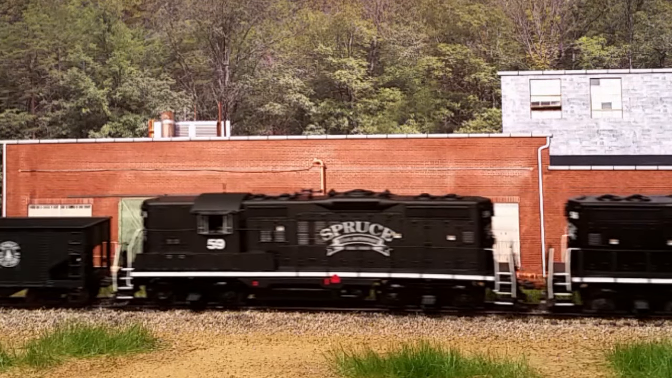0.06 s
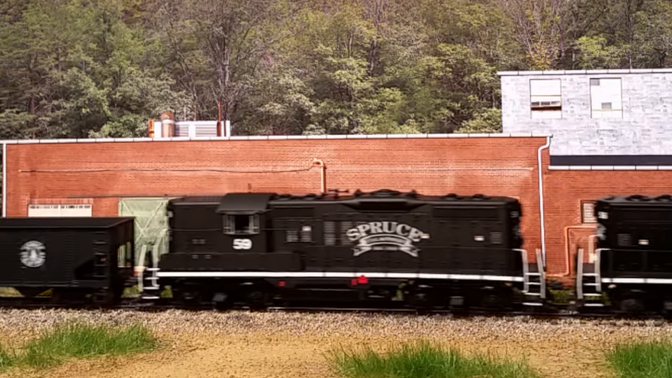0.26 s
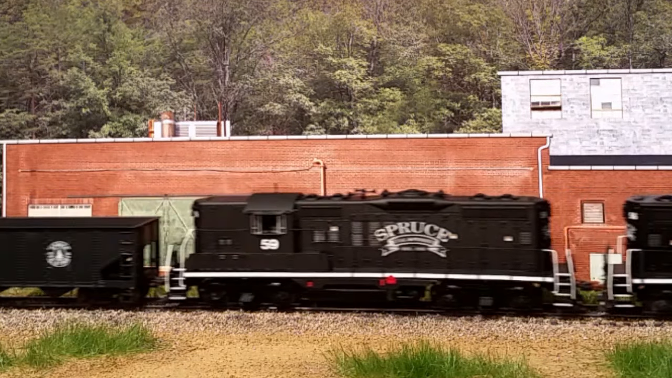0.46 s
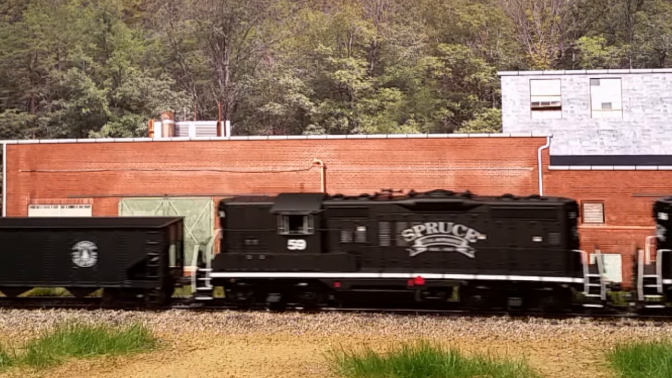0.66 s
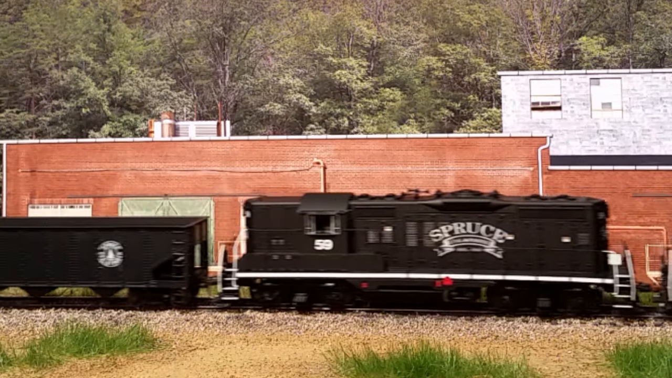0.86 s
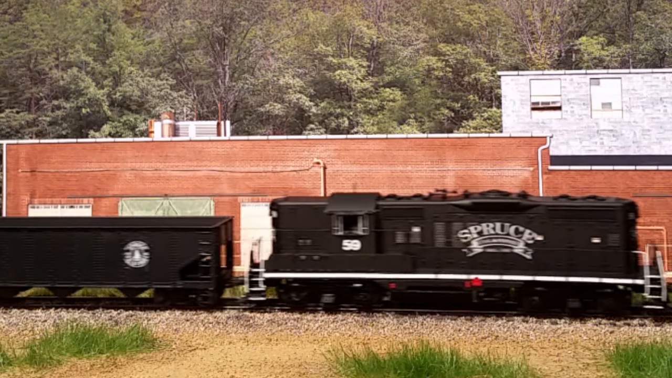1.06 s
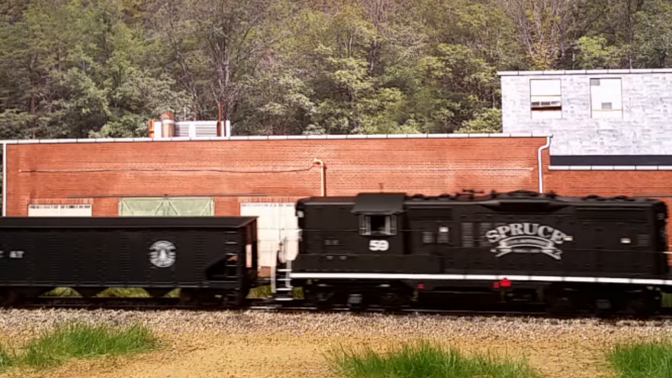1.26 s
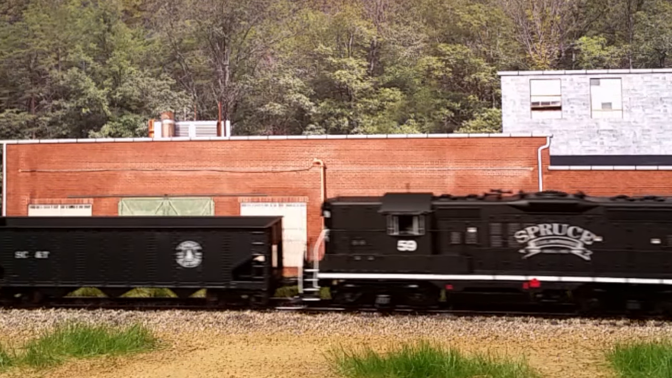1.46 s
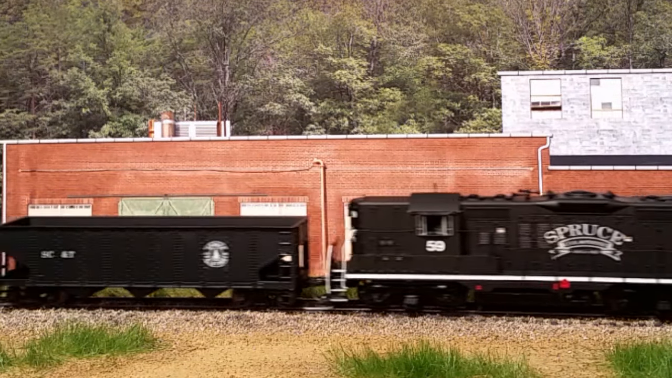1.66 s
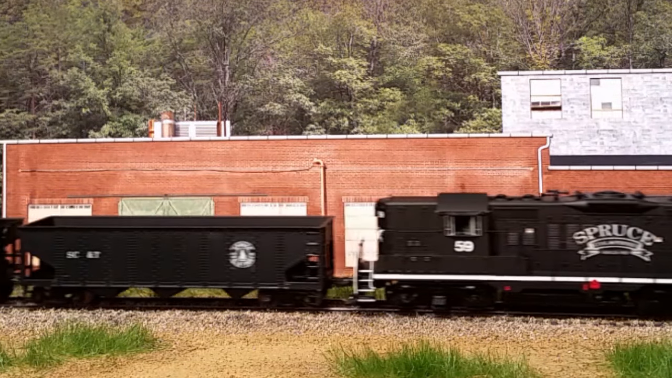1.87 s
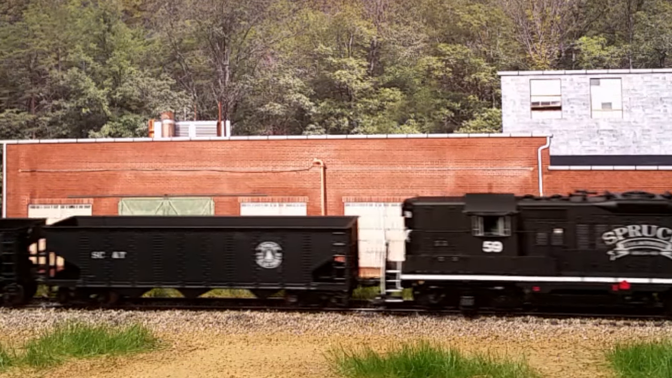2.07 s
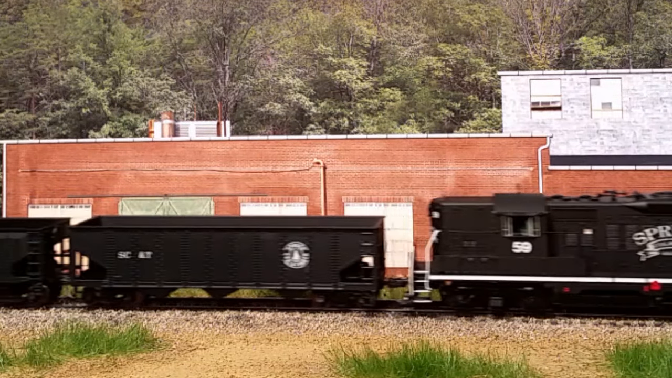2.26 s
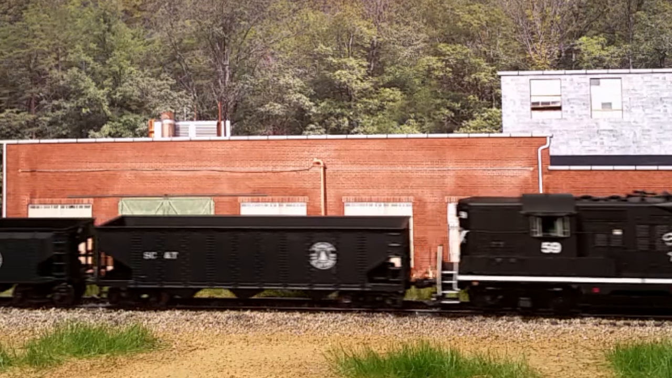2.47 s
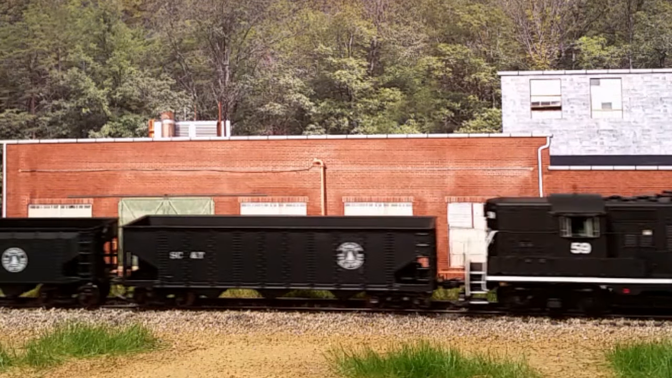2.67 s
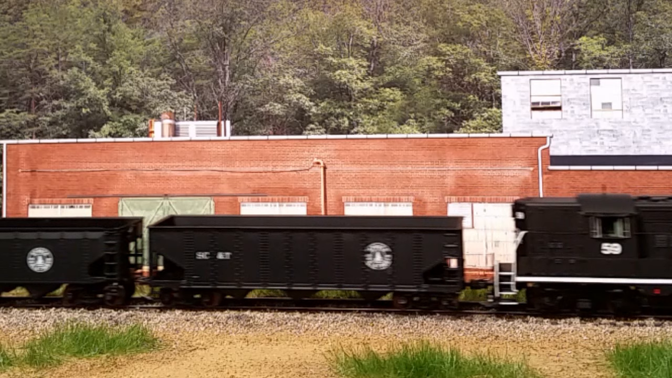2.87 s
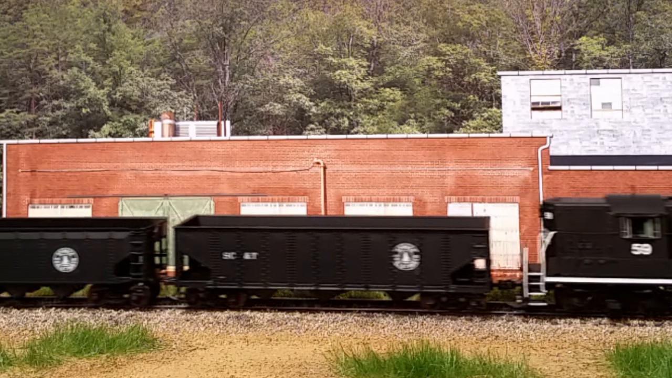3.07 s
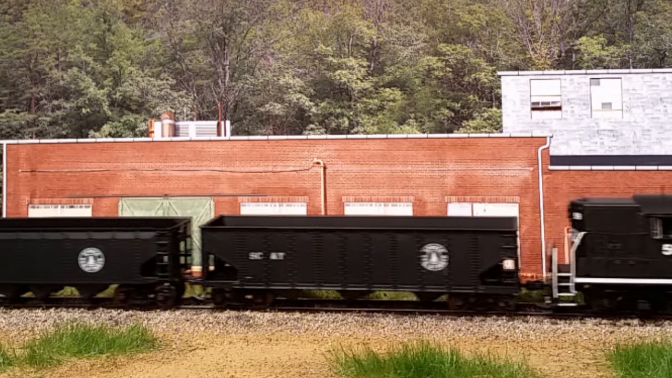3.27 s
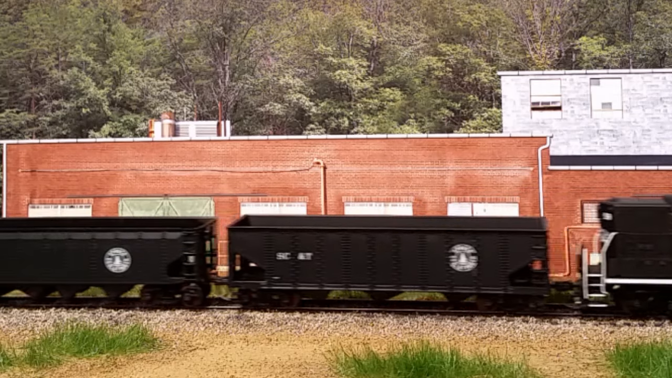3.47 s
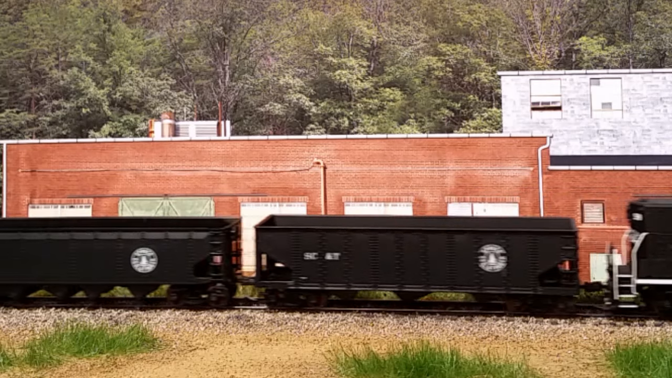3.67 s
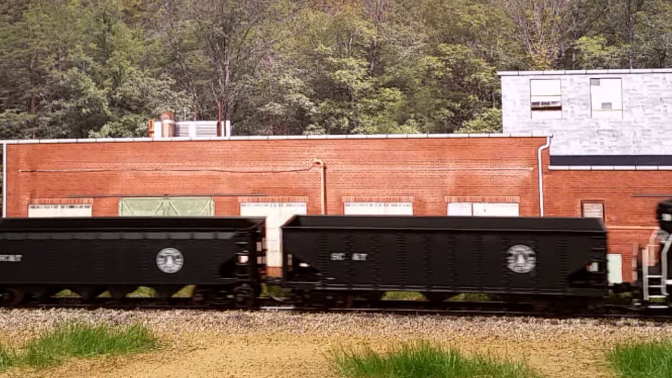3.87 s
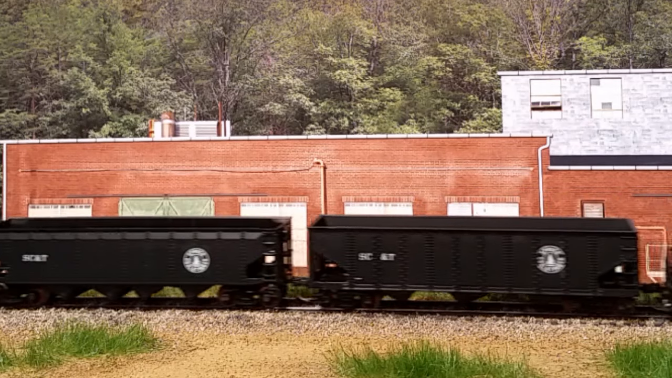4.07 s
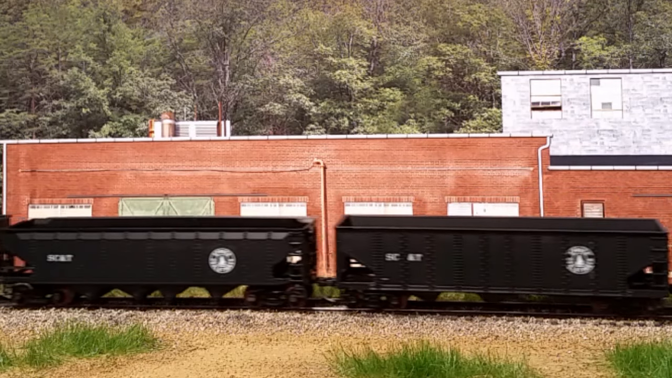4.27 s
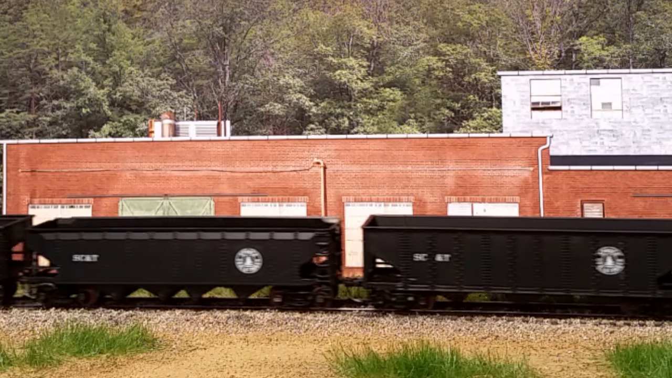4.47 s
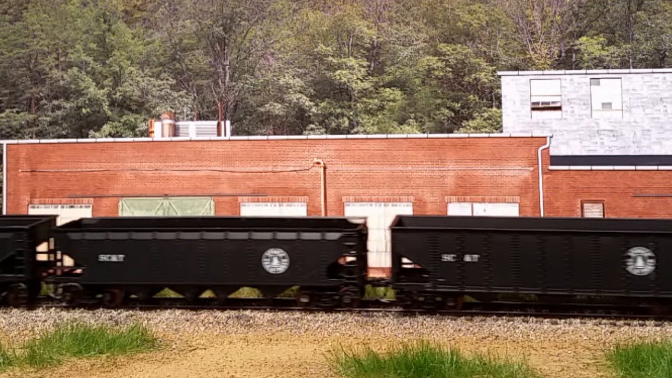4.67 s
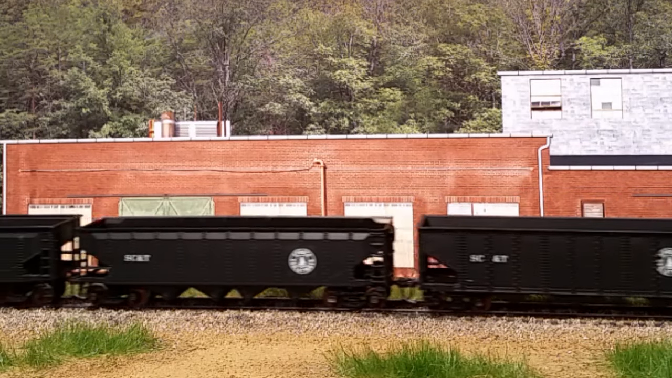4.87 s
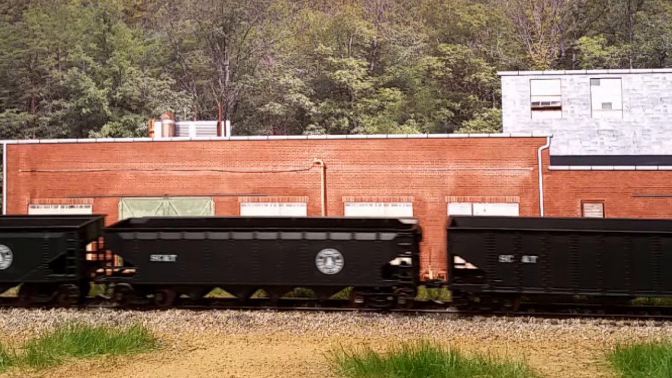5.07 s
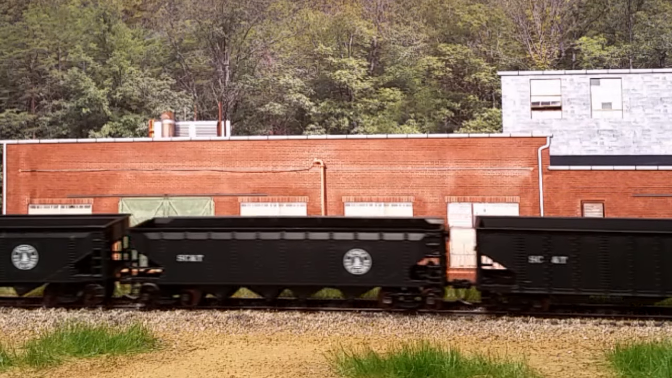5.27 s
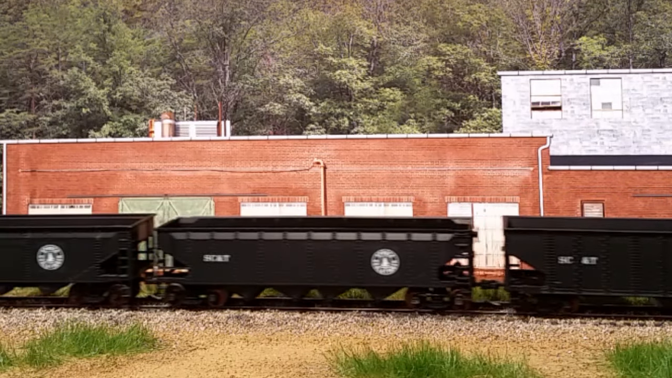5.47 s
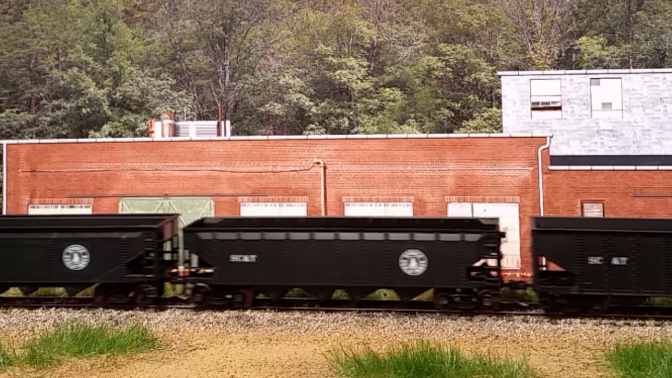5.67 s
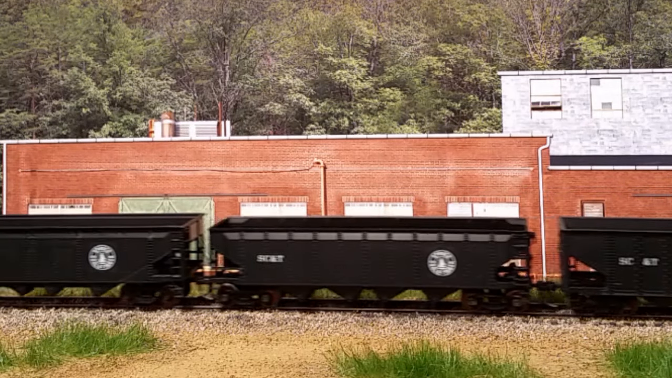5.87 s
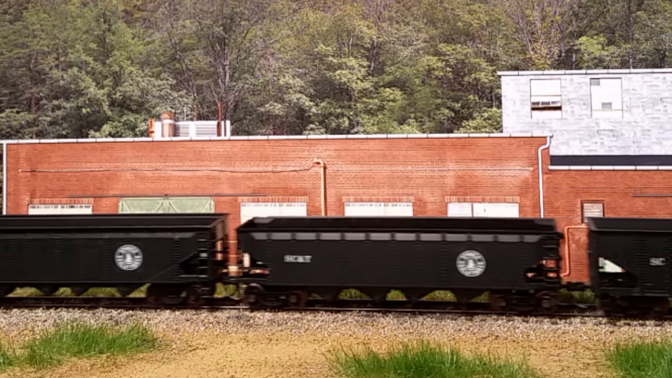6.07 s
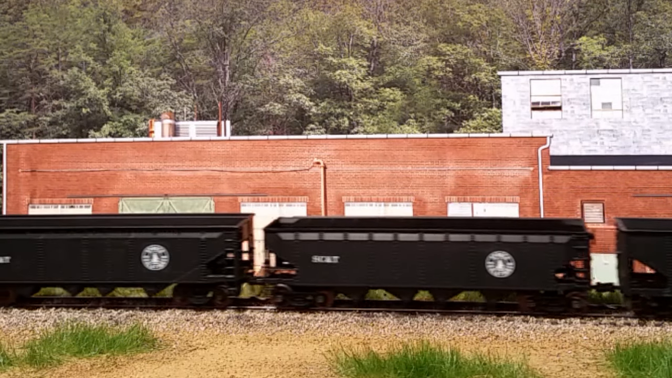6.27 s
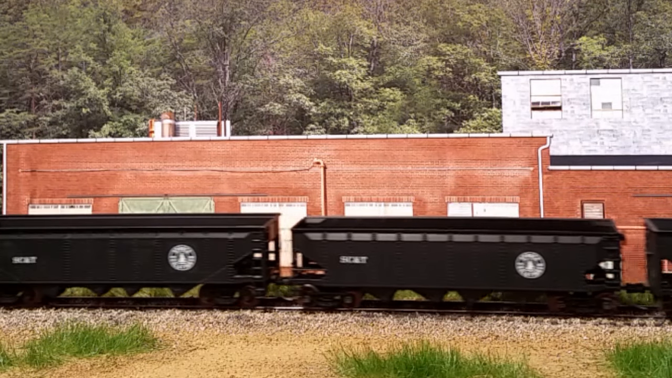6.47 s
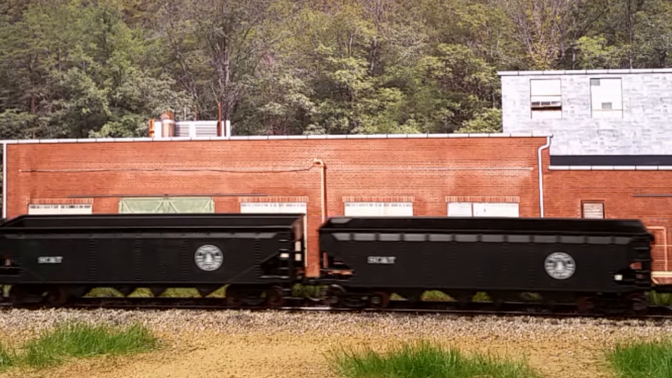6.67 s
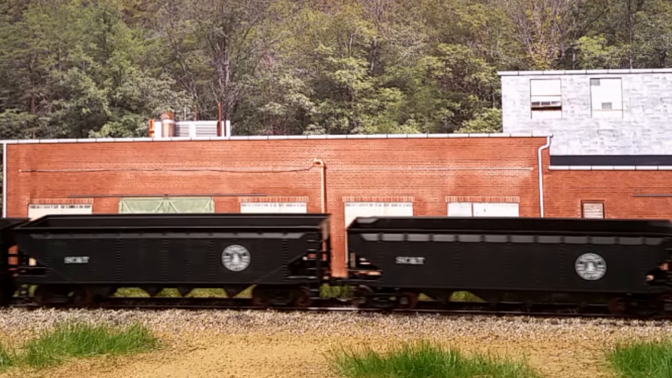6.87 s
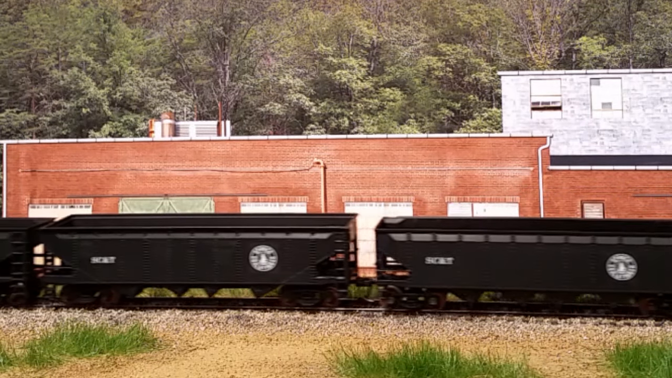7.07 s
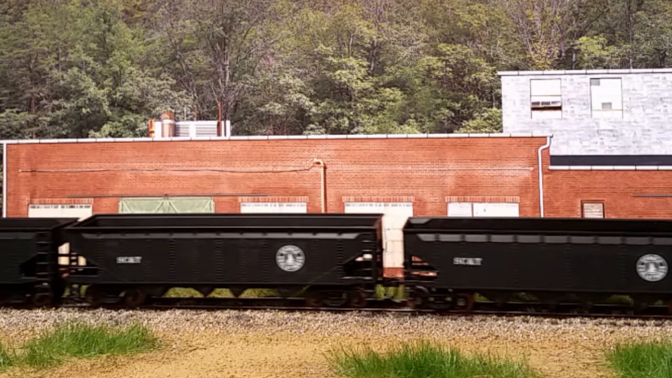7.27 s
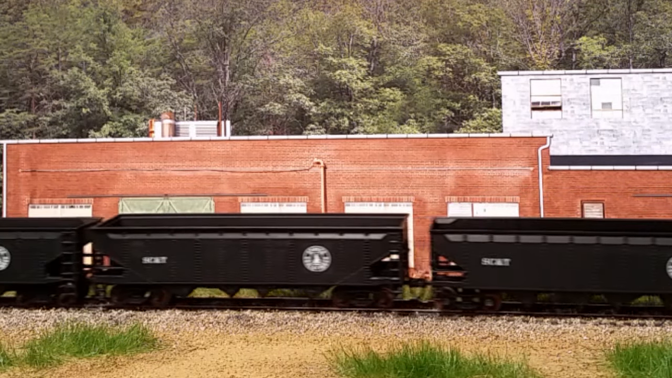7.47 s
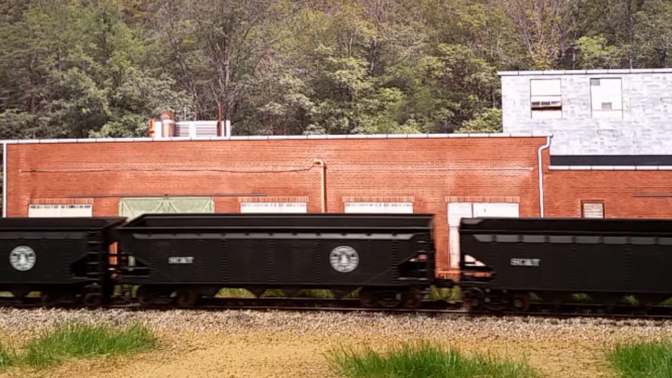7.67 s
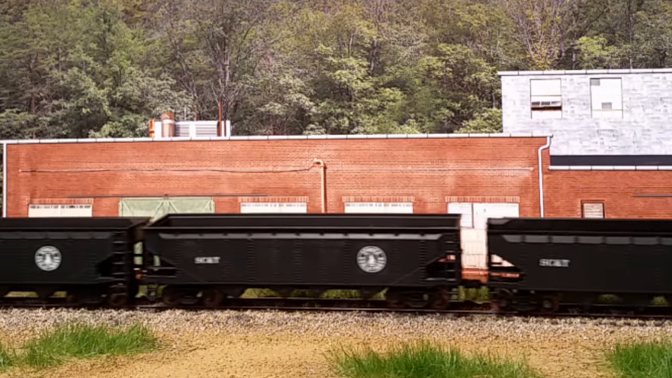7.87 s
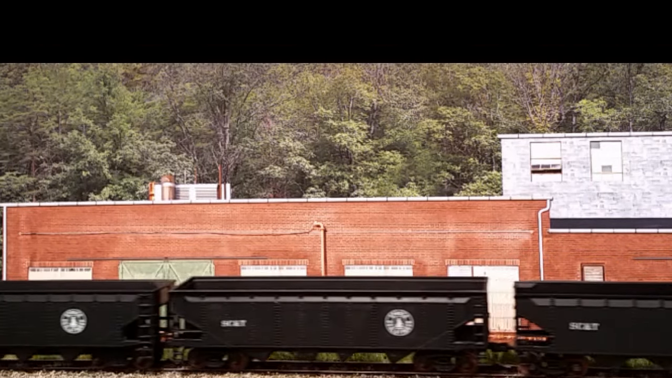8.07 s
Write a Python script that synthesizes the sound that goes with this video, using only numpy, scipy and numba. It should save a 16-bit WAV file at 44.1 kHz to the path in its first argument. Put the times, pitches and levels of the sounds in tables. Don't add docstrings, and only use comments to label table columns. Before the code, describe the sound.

In a small room, a model train is already passing at 0 s: plastic locomotive shells rattle with dense gear-tooth contacts, strongest around 2 to 3 kHz, fluttering about twelve times a second against a slightly slower second gear. A steady motor hum near 650 Hz and faint wavering mesh whistles sit inside the whir. Hard irregular knocks crowd the first 1.8 s, then thin out until about 3.6 s; bright coupler clicks fall near 0.6, 0.7 and 2.5 s. From 3 to 5 s the gears weaken and dry, gritty wheel hiss of the cars becomes more evident. Quiet ticks come near 5 s, with two stronger knocks around 6 s. Low room rumble, mains hum, a very high thin whine and faint input hiss run throughout. From about 5.7 s everything fades steadily, still faintly whirring at about 8 s. Close stereo, mostly brighter on the right.

```python
import sys
import numpy as np
from scipy import signal
from scipy.fft import rfft, irfft, next_fast_len
from scipy.io import wavfile
from scipy.ndimage import uniform_filter1d, map_coordinates
from numba import njit

SR = 44100
rng = np.random.default_rng(int(sys.argv[2]) if len(sys.argv) > 2 else 0)


def to_wav(s):
    ch = np.atleast_2d(s).T
    pcm = np.round(np.clip(ch, -1, 1) * 32767)
    wavfile.write(sys.argv[1], SR, pcm.astype(np.int16))


def level_to_linear(level):
    exponent = np.asarray(level, float) / 20
    return 10 ** exponent


N = 358523
T = np.arange(N) / SR
SIZE = next_fast_len(N + SR)
F = np.maximum(np.fft.rfftfreq(SIZE, 1 / SR), 1)

PART_EDGES = (330, 900, 1700, 2350, 3300, 5200, 6300, 8000)


def train():
    levels = part_levels()
    baseboard_db, shell_db = levels[1], levels[3]
    blows = jolts(shell_db + 15, 0.007)
    throb = gear_throb(blows)
    rattle = rfft(shell_rattle(blows), SIZE)
    gears = rfft(gear_hiss(throb), SIZE)
    air = rfft(wheel_air(throb), SIZE)
    drives = [rattle] * 4 + [gears] * 3 + [air]
    body = shell_body()
    above = [1 / (1 + (hz / F) ** 16) for hz in PART_EDGES] + [0]
    out = np.zeros((2, N))
    for k, (db, drive) in enumerate(zip(levels, drives)):
        band = np.sqrt(above[k] - above[k + 1])
        flicker_db = (-0.15 + 0.16 * min(k, 8 - k)) * walk(22.06)
        out += level_to_linear(db + flicker_db) * colour(drive, body * band)
    return out + mesh_whistles(baseboard_db)


# [t/s, gear load level/dB, shell turned high side on level/dB, car wheels in earshot level/dB]
TRAIN_MOVES = [(0, 1.5, 2.5, 9), (.3, -1, -2, -7), (.75, -2.5, -2, -7), (1.1, 0, -3, -15), (1.5, 1.5, 1, 1),
               (1.9, 1.5, -3, -26), (2.4, 2, 1, -13), (2.8, 2, 3, -7), (3.3, 1, 1, 3), (3.8, 0.5, 2, -1.5),
               (4.25, -1, 3, 6.5), (4.7, 0, -3, 4.5), (5.3, 1.5, -1.5, 6), (5.7, 2, -2, 8.5),
               (6.0, -5.5, 7, 6.5), (6.4, 1.5, 0, 7.5), (7.2, 0, 1.5, 8), (8.13, -5, -1, 1)]
# [start level/dB, loss with distance/(dB/s), shares of load, turn, wheels]
PARTS = [
    (-39, 0.66, 0.34, 0.1, -0.097),
    (-32.5, 1.07, .4, 0.3, -0.016),
    (-23, 2.64, .99, -0.88, -0.022),
    (-24, 1.07, 0.8, 1, 0.045),
    (-30, 1.16, 0.83, 0.42, -0.081),
    (-41.5, .01, .1, 0.33, 0.93),
    (-33, 1.75, 0.5, 0.73, -0.21),
    (-47, 0.81, 0.36, 0.29, 0.029),
]


def part_levels():
    load, turn, wheels = curves(TRAIN_MOVES)
    db = np.array([start - loss * T + a * load + b * turn + c * wheels for start, loss, a, b, c in PARTS])
    db[6] += -34 * bump(6.8, 0.4)
    return db + fader_db()


def shell_rattle(blows):
    knocking = 1 + blows + near_gear(1.5, 0.0044, count=1) + far_gear(3.5, 0.057, count=1)
    return ports(contacts(knocking * level_to_linear(0.34 * walk(60)), -6, 1.6), -6.5, 0.17, count=12)


def gear_throb(blows):
    return 0.3 * blows + near_gear(2.8, 0.013, count=2) + far_gear(4.7, 0.027, count=2)


# [t/s, lower f/Hz, upper f/Hz, far gear knock level/dB]
REFLECTIONS = [(0, 4270, 6750, -7), (1, 4380, 6780, 4.5), (2.2, 4300, 7050, 1.5), (3, 4700, 7070, 5.5),
               (4.3, 4150, 6830, 12.5), (5, 4205, 7370, 9.5), (5.7, 3930, 7400, -1), (6, 4140, 7500, 5.5),
               (6.3, 4590, 7740, 5.5), (7, 4880, 7300, 4.5), (8.13, 4900, 7140, 17)]


def gear_hiss(throb):
    gears = ports(contacts((1 + throb) * level_to_linear(0.25 * walk(70)), 0, 2.38), -9.5, 0.097, count=16)
    for hz in curves(REFLECTIONS)[:2]:
        gears = ridge(gears, np.tan(np.pi * hz / SR), 600 / hz, 0.97)
    return gears


def wheel_air(throb):
    grit = level_to_linear(2.4 * rng.exponential(size=(2, N))) * rng.standard_normal((2, N))
    return grit * (1 + 0.2 * throb) * level_to_linear(0.82 * walk(110))


# [place in turn 0-1, rattle level/dB, hiss level/dB]
NEAR_KNOCKS = [
    (0.278, -8.5, -36),
    (0.508, -6, -7.5),
    (0.782, -7, -5.5),
    (0.962, -1.5, -44),
]


def near_gear(scatter_db, decay_s, count):
    return knocks(12.23, NEAR_KNOCKS, scatter_db, decay_s, count)


# [place in turn 0-1, rattle level/dB, hiss level/dB]
FAR_KNOCKS = [
    (0.98, -27, -11),
    (0.22, -25.5, -20),
    (0.33, -55, -23),
]


def far_gear(scatter_db, decay_s, count):
    far_db = curves(REFLECTIONS)[2]
    return level_to_linear(far_db) * knocks(10.955, FAR_KNOCKS, scatter_db, decay_s, count)


def knocks(turn_hz, table, scatter_db, decay_s, count):
    blows = np.zeros(N + SR)
    turns = np.arange(int(turn_hz * N / SR) + 1)
    for row in table:
        size = level_to_linear(row[count] + scatter_db * rng.standard_normal(len(turns)))
        np.add.at(blows, ((turns + row[0]) / turn_hz * SR).astype(int), size)
    return die_away(blows[:N], decay_s)


# [t/s, peak level/dB]
JOLTS = [(0.078, -21), (0.218, -13), (0.24, -7.5), (0.298, -15), (0.459, -14), (0.6365, -13), (0.946, -12),
         (0.9867, -28), (1.046, -18), (1.1214, -8.5), (1.2266, -19), (1.291, -18), (1.3667, -7),
         (1.431, -12.5), (1.516, -18), (1.5349, -20), (1.6182, -12), (1.7853, -16), (2.171, -18),
         (2.1916, -25), (2.5755, -15), (2.7851, -18), (2.8474, -16), (3.0255, -16), (3.255, -13),
         (3.5598, -11), (5.193, -18), (5.931, -8), (6.022, -7.5)]


def jolts(around_db, decay_s):
    s, db = np.transpose(JOLTS)
    at = (s * SR).astype(int)
    blows = np.zeros(N)
    blows[at] = level_to_linear(db - around_db[at])
    return die_away(blows, decay_s)


# [t/s, lag/ms]
LEFT_LAG = [(0, 0.026), (1.5, 0.11), (4, 0.2), (8.13, 0.37)]


def contacts(throb, spread_db, grain_db):
    grit = level_to_linear(grain_db * rng.exponential(size=(3, N))) * rng.standard_normal((3, N)) * throb
    lag = curves(LEFT_LAG)[0] * SR / 1000
    left = map_coordinates(grit[0], [np.arange(N) - lag], order=3)
    return np.array([left, grit[0]]) + level_to_linear(spread_db) * grit[1:]


# [f/Hz, level/dB per Hz]
BODY = [(180, -57), (300, -22.5), (604, -17), (639, -13.5), (777, -20), (857, -18), (1100, -16),
        (1290, -10), (2250, 10.5), (2740, 8), (3420, -5.5), (4280, -3), (5430, -13), (6890, -4.5),
        (8500, -20.5), (11000, -66), (18700, -120)]
# [f/Hz, level/dB per Hz]
AIR = [(4410, -30), (7500, 0), (7920, -30), (8270, -15), (10500, -8.5), (12300, -16), (14100, -20),
       (15500, -22.5)]
# [f/Hz, width/Hz, lift level/dB]
SHELL_MODES = [(560, 11, 1.5), (712, 67, 5.5), (856, 20, 5), (1019, 18, 6), (1170, 90, 4.5),
               (1278, 105, 5.5), (1505, 98, 3), (1463, 36, 5.5), (1931, 104, 6.5), (2070, 21, 3.5),
               (2247, 46, 3.5), (2680, 38, -4.5), (2660, 120, 5), (2810, 250, 6), (3140, 48, 4),
               (5700, 490, 3.5), (9500, 130, -1.5), (10570, 370, 0.5), (12100, 700, 6)]
# [f/Hz, level/dB]
PORT_BALANCE = [(100, 1), (700, -2), (1500, -7.5), (2500, -9), (4500, -12.5), (5600, -20.5), (6300, -31.5),
                (7500, -21.5), (8200, -19), (8700, 9), (9500, 34), (10100, 8), (11000, 18), (11700, 1),
                (13500, -4), (16000, -2)]


def shell_body():
    left = level_to_linear(slope(PORT_BALANCE))
    port = np.array([left, np.ones_like(F)]) / np.sqrt(1 + left ** 2)
    spectrum_db = np.where(F < PART_EDGES[-1], slope(BODY), slope(AIR))
    return level_to_linear(spectrum_db) * modes(SHELL_MODES) * port


# [f/Hz, level/dB against the baseboard band]
MESH_TONES = [
    (866.5, -14.5),
    (1028.5, -13.5),
    (1518.5, -8.5),
]


def mesh_whistles(baseboard_db):
    out = np.zeros((2, N))
    for hz, db in MESH_TONES:
        turn = 2 * np.pi * np.cumsum(hz + 2.47 * walk(6)) / SR
        level = level_to_linear(baseboard_db + db - 0.83 * T + 2.8 * walk(5))
        out += level * np.array([0.5 * np.sin(turn - 1.3), 2.0 * np.sin(turn)])
    return out


# [t/s, level/dB]
HUM = [(0, -45.5), (1, -41), (1.6, -44), (2.1, -41.5), (3, -45), (3.5, -42), (5, -51.5), (6.2, -51),
       (7.3, -45.5), (8.13, -46.5)]


def motor():
    turn = 2 * np.pi * np.cumsum(650.8 + 0.4 * walk(3)) / SR
    tone = []
    for delay in (0.45, 0):
        octave = level_to_linear(-10 + 2.0 * walk(1.86)) * np.sin(2 * turn - 1.2 * delay)
        tone.append(np.sin(turn - delay) + octave)
    db = curves(HUM)[0] + fader_db() + 1.8 + 0.5 * walk(4)
    return np.sqrt(2) * level_to_linear(db + np.array([[-2.8], [2.1]])) * tone


# [t/s, level/dB, ring/s to -60 dB]
TICKS = [
    (0.5685, -19, 0.02),
    (0.6678, -16, 0.025),
    (2.4848, -26, 0.018),
    (5.0494, -30, 0.02),
    (5.3894, -42, 0.02),
    (5.9294, -41, 0.022),
    (6.3294, -38, 0.02),
    (7.6156, -50, 0.02),
    (7.7608, -45, 0.02),
]


def ticks():
    out = np.zeros((2, N))
    for s, db, t60 in TICKS:
        start = int(s * SR)
        burst = rng.standard_normal((2, 2000)) * level_to_linear(db - 60 * np.arange(2000) / SR / t60)
        out[:, start:start + 2000] += burst
    band = signal.butter(2, (9900, 12800), "bandpass", fs=SR, output="sos")
    return signal.sosfilt(band, out) * level_to_linear([[4], [-5]])


# [f/Hz, level/dB per Hz]
ROOM_LOWS = [(15, -42), (25, -16), (40, 5.5), (54, -1.5), (151, -3), (174, -1), (240, -4), (303, -4),
             (400, -9), (520, -37), (880, -120)]
# [f/Hz, width/Hz, lift level/dB]
ROOM_MODES = [(57, 9.3, 10.5), (97, 10.6, 7), (122, 16, 4.5), (148.8, 8.1, 9), (202, 10, 2.5),
              (241, 17, 5.5)]


def rumble():
    mid, side = rfft(rng.standard_normal((2, N)), SIZE)
    gain = level_to_linear(slope(ROOM_LOWS)) * modes(ROOM_MODES)
    gain = gain / (1 + (F / PART_EDGES[0]) ** 12) / (1 + (41 / F) ** 6)
    apart = colour(side, gain * np.minimum(F / 400, 1))
    both = colour(mid, gain) + level_to_linear(-10) * apart * np.array([[1], [-1]])
    return level_to_linear(rumble_db()) * both * level_to_linear([[-0.6], [0.6]])


def rumble_db():
    return -41.5 - 4 * bump(0, 0.34) - 0.64 * T + fader_db()


# [f/Hz, level/dB]
MAINS = [
    (59.5, -61),
    (91.3, -66),
]


def mains():
    fade_db = rumble_db() + 47.0
    out = np.zeros(N)
    for hz, db in MAINS:
        out += level_to_linear(db + fade_db + 1.4 * walk(12)) * np.sqrt(2) * np.sin(2 * np.pi * hz * T)
    return out


# [t/s, width/s, level/dB]
WHINE_SWELL = [
    (.0, .03, 14),
    (1.2, .6, 5),
    (5.2, .6, 9),
    (6.5, .4, 6),
]


def whine():
    noise = rfft(rng.standard_normal((2, N)), SIZE)
    swell_db = sum(db * bump(s, width_s) for s, width_s, db in WHINE_SWELL)
    db = -72 + 2 * walk(7) + swell_db + 0.6 * fader_db()
    return level_to_linear(db) * colour(noise[0] + 0.7 * noise, 1 / (1 + ((F - 15690) / 45) ** 2))


def preamp():
    hiss = colour(rfft(rng.standard_normal((2, N)), SIZE), 1 / (1 + (12500 / F) ** 8))
    return level_to_linear(-61 + 0.6 * fader_db()) * hiss


def fader_db():
    return 20 * np.log10(np.clip((8.68 - T) / (8.68 - 5.74), 0.01, 1))


def ports(x, wet_db, t60, count):
    out = np.pad(x, ((0, 0), (0, SR)))
    tail = np.arange(SR // 8) / SR
    hop = N // count
    for k in range(-1, count):
        a, b = max(k * hop, 0), min((k + 2) * hop, N)
        piece = x[:, a:b] * np.sin(np.pi * (np.arange(a, b) - k * hop) / (2 * hop))
        echo = rng.standard_normal((2, len(tail))) * level_to_linear(-60 * tail / t60) * (tail > 0.002)
        wet = signal.fftconvolve(piece, echo / np.sqrt(np.sum(echo[0] ** 2)), axes=1)
        out[:, a:a + wet.shape[1]] += level_to_linear(wet_db) * wet
    return out[:, :N]


@njit
def ridge(x, g, k, lift):
    y = x.copy()
    for c in range(2):
        band, low = 0., 0.
        for i in range(x.shape[1]):
            v = (band + g[i] * (x[c, i] - low)) / (1 + g[i] * (g[i] + k[i]))
            band, low = 2 * v - band, low + 2 * g[i] * v
            y[c, i] += lift * k[i] * v
    return y


def die_away(blows, decay_s):
    return signal.lfilter([1], [1, -np.exp(-1 / (decay_s * SR))], blows)


def curves(table):
    s, *columns = np.transpose(table)
    return [np.interp(T, s, c) for c in columns]


def slope(points):
    hz, db = np.transpose(points)
    return np.interp(np.log(F), np.log(hz), db)


def modes(table):
    return 1 + sum((level_to_linear(db) - 1) / (1 + (2 * (F - hz) / w) ** 2) for hz, w, db in table)


def colour(spectrum, gain):
    y = irfft(spectrum * gain, SIZE)[..., :N]
    return y / np.std(y.reshape(-1, N).mean(axis=0))


def walk(rate):
    k = int(SR / rate)
    held = np.repeat(rng.standard_normal(N // k + 1), k)
    w = uniform_filter1d(uniform_filter1d(held, k), k)[:N]
    return w / w.std()


def bump(s, width_s):
    return np.exp(-((T - s) / width_s) ** 2)


def scene():
    return train() + motor() + rumble() + mains() + whine() + ticks() + preamp()


def band_limit(x):
    return signal.sosfilt(signal.butter(12, 15790, fs=SR, output="sos"), x)


def record(dry):
    soft = dry / (1 + np.abs(dry / 0.97) ** 6) ** (1 / 6)
    return band_limit(soft)


dry = scene()
out = record(dry)
to_wav(out)
```